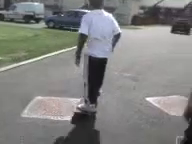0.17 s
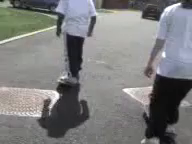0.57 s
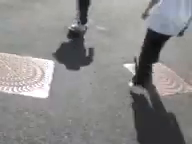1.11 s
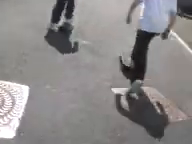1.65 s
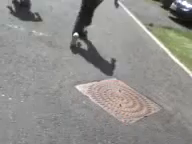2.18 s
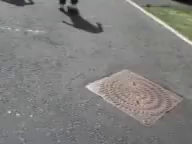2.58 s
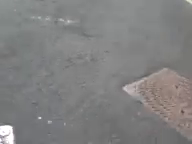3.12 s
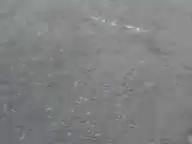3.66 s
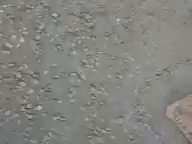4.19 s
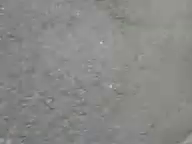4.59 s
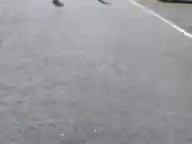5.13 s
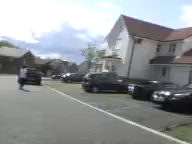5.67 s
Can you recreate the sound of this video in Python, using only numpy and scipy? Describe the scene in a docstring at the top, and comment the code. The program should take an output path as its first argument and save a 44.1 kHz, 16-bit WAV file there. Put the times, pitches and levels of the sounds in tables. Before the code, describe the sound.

Hard skateboard wheels rumble and rattle over coarse asphalt, with irregular clacks and knocks that grow denser and peak in a harsh, overloaded burst.

```python
"""On an open street, skateboards roll over coarse asphalt and ribbed drain covers.
Grit and small stones under the hard wheels excite the modes of deck, wheels and axles all the time.
Stones and edges strike the same modes harder; once a foot or board tail lands with a dull thump.
Far traffic and air lie behind as coloured noise.
A small microphone with a narrow band overloads on the loudest knocks."""
import sys
import numpy as np
from scipy import signal
from scipy.fft import rfft, irfft
from scipy.io import wavfile

SR = 44100
rng = np.random.default_rng(int(sys.argv[2]) if len(sys.argv) > 2 else 0)


def int16_out(signal):
    """Quantize to a 16-bit WAV file."""
    q = np.round(np.clip(np.atleast_2d(signal).T, -1, 1) * 32767)
    wavfile.write(sys.argv[1], SR, q.astype(np.int16))


def boost_factor(decibels):
    """Convert a level in decibels to a linear amplitude factor."""
    exponent = np.asarray(decibels, float) / 20
    return 10 ** exponent


N = 254222

# How hard the boards roll, and how much of it is loose rattle in the axles.
# Each row: time in seconds, rolling level in dB, rattle share in dB.
ROLLING_COURSE = [(0, -29, -4.5), (.3, -26, -9), (.65, -25.5, -2), (.97, -29, -8), (1.25, -21, -3.5),
                  (1.58, -20.5, -2.5), (1.7, -29, -2.5), (1.9, -28.5, 0), (2.07, -17, -8),
                  (2.25, -21.5, -3), (2.47, -23.5, -5), (2.65, -20.5, -4), (2.82, -22, -12),
                  (3.25, -17.5, -10), (3.56, -25.5, -5.5), (3.87, -21.5, -11), (4.15, -24, -10),
                  (4.35, -32, -4), (4.7, -27.5, 0), (4.86, -15, -2.5), (4.97, -22, -8.5), (5.3, -26, -7.5),
                  (5.553, -34.5, -12.5), (5.57, -16, 1), (5.65, -15, -6.5), (5.76, -12, -17)]
# Resonances of the three parts of a board.
# Each row: frequency in Hz, level in dB, decay time to -60 dB in seconds.
DECK_MODES = [(301.6, 1.5, 0.019), (361.2, 7.5, 0.027), (425, 3, 0.0091)]
WHEEL_MODES = [(560, -4, 0.026), (641, -4.5, 0.033), (769.4, 2.5, 0.015), (867, -1.5, 0.0094)]
AXLE_MODES = [(1151.6, -2.5, 0.016), (1440, -1.5, 0.011), (1659, 1, 0.0056), (1831, -2.5, 0.01),
              (2177, -3.5, 0.011), (2430, -0.5, 0.0097), (2720, -5, 0.0063), (3156, -11, 0.021),
              (3820, -36.5, 0.022)]


def rms_one(x):
    """Normalisation: division by the root mean square gives unit power."""
    return x / np.sqrt(np.mean(x ** 2) + 1e-20)


def drift(corner_hz):
    """Slow random modulation of rms 1: noise through two equal one-pole low-passes."""
    step = 40      # samples between the points of the slow curve
    pole = np.exp(-2 * np.pi * corner_hz * step / SR)
    noise = rng.standard_normal(N // step + 2002)
    slow = signal.lfilter([1], [1, -2 * pole, pole * pole], noise)[2000:]      # settled part only
    return np.interp(np.arange(N) / step, np.arange(len(slow)), rms_one(slow))


def ring(push, hz, t60):
    """Damped resonator: a unit impulse sets off a decaying sine of initial height 1."""
    radius = boost_factor(-60 / (t60 * SR))
    angle = 2 * np.pi * hz / SR
    return signal.lfilter([0, np.sin(angle)], [1, -2 * radius * np.cos(angle), radius ** 2], push + 1e-18)


def clicks(per_s, spread_db):
    """Random impulse train: chance impulses of either sign, most small and a few large."""
    sizes = boost_factor(spread_db * np.minimum(rng.exponential(1, N), 4))
    signs = rng.choice([-1, 1], N)
    return sizes * signs * (rng.random(N) < per_s / SR)


def rolling(modes, lumps, stones, stone_db):
    """Modal excitation by roughness: grit and stones drive one part, each stone favouring some modes."""
    grit_per_s, crunch_s = 900, 0.0041
    fade = np.exp(-1 / (crunch_s * SR))
    out = 0
    for hz, level_db, t60 in modes:
        grit = rms_one(clicks(grit_per_s, spread_db=4.5)) * lumps
        favour = boost_factor(7.6 * np.clip(rng.standard_normal(N), -3, 1.4))
        crunch = rms_one(signal.lfilter([1], [1, -fade], stones * favour + 1e-18))
        push = grit + boost_factor(stone_db) * crunch * rng.standard_normal(N)
        push = push * boost_factor(2.97 * drift(10.9))      # each mode wavers by itself
        out = out + boost_factor(level_db) * rms_one(ring(push, hz, t60))
    return rms_one(out)


def struck(modes, share_db, loudest_hz, length_ms, lag_ms):
    """Impact excitation: a short rough force drives most the modes near the struck spot's pitch."""
    late = np.maximum(np.arange(4000) * 1000 / SR - lag_ms, 0)
    force = (1 - np.exp(-late / (0.092 * length_ms))) * np.exp(-late / length_ms)
    contact = rng.standard_normal(force.shape) * force
    octaves_off = np.log2(np.array(modes)[:, 0] / loudest_hz)
    chance_db = 3 * rng.standard_normal(octaves_off.shape)
    strengths = boost_factor(chance_db + 12 * np.exp(-(octaves_off / .2) ** 2))
    rings = 0
    for k, (hz, level_db, t60) in enumerate(modes):
        # the wheel passes mostly the pitches the part itself rings at: each resonance acts twice
        passed = ring(contact, hz, 0.44 * t60)
        rings = rings + boost_factor(level_db) * strengths[:, [k]] * ring(passed, hz, t60) / t60
    return rings / np.abs(rings).max(axis=1, keepdims=True) * boost_factor(share_db)


def knocks():
    """Coupled impact: each knock rings all parts, the heavy deck a little late, loose axles louder."""
    # Stones and edges that strike the board. Each row: start in seconds, peak level in dB ahead of the
    # bass cut, share of deck thud in dB, loudest ring in Hz, decay constant of the contact in ms.
    blows = [(0.072, -7.5, -8, 870, 15.6), (.115, -4, -16, 1120, 2.7), (0.275, -6, -26, 1150, 1.3),
             (0.338, -8, -8, 830, 14), (0.369, -4.5, -18.5, 1520, 1.8), (0.524, -18, -9, 750, 5.4),
             (.589, -5.5, -15, 920, 15), (.69, -8.5, -2, 760, 13), (1.168, -5, -14, 595, 1.4),
             (1.273, 0, -4, 494, 7.3), (1.466, 1, -46, 890, 2.6), (1.508, -4.5, -19, 1790, 16),
             (1.586, -5, -17, 795, 1.1), (1.651, -4, -4.5, 530, 2.1), (1.672, -3.5, -6.5, 797, 6.2),
             (1.72, -8.5, -4, 506, 1.8), (1.736, -2.5, -15, 614, 2.8), (1.872, -8.5, -3, 580, 0.76),
             (2.089, 0.5, -4.5, 556, 3.8), (2.104, -6.5, -4, 630, 4.2), (2.209, 2, -18.5, 615, 9.5),
             (2.254, 1, -14, 900, 0.7), (2.312, 4.5, -13.5, 900, 5.1), (2.387, -5, -5, 830, 8.6),
             (2.526, -3, -10, 620, 11.5), (2.577, 2.5, -9.5, 560, 3), (2.604, -19.5, -22, 2790, 3.2),
             (2.636, -5.5, -18, 790, 4.1), (2.654, -1, -22, 770, 4.2), (2.827, -8, -10, 754, 8.7),
             (2.919, 0, -0.5, 754, 7.6), (3.011, 1, -3, 780, 2.9), (3.048, -0.5, -4, 506, 3),
             (3.066, -0.5, -26, 780, 3.5), (3.176, -0.5, -14, 775, 1.7), (3.239, -8.5, -7, 780, 7.1),
             (3.357, -9.5, -2, 710, 6.3), (3.412, -7.5, -20, 660, 13), (3.459, 2, -38, 855, 5),
             (3.523, -1.5, -16, 750, 6), (3.619, -4, -10, 770, 17), (3.678, -5.5, -7.5, 630, 5.9),
             (3.725, 1.5, -16, 747, 7), (3.79, 4.5, -16, 660, 5.2), (4.081, -1.5, -15, 730, 1.6),
             (4.18, -4.5, -13, 800, 3.1), (4.251, -7.5, -12.5, 1980, 11), (4.269, -0.5, -15.5, 2180, 2.5),
             (4.454, -5, 22, 544, 4.2), (4.509, 1.5, -34, 565, 10), (4.558, 3, -12, 550, 6.8),
             (4.603, 3.5, -14, 567, 5), (4.64, 11, -7.5, 1430, 6.8), (4.691, -2, -25, 1410, 1.8),
             (4.707, 4, -15, 560, 9.9), (4.749, 12.5, -20, 632, 11), (4.781, 3, -9.5, 1440, 15),
             (4.82, 3, -11, 650, 2.5), (4.835, 2.5, -11.5, 555, 6.5), (4.904, -0.5, -15.5, 615, 5.4),
             (4.983, -5, -2, 816, 14), (5.031, 0.5, -10, 654, 4.6), (5.161, -1, -17, 854, 6.4),
             (5.197, -10, -19, 2500, 4), (5.242, -5.5, -11, 560, 7.1), (5.258, -7.5, -19, 1440, 3.8),
             (5.567, -4.5, -19, 1850, 4.8), (5.6, 2, -6, 572, 9), (5.694, -1, -4.5, 795, 12),
             (5.722, 0, -4.5, 755, 8.9)]
    s, peak_db, deck_db, loudest_hz, length_ms = np.transpose(blows)[:, :, None]
    times, _, rattle_db = np.transpose(ROLLING_COURSE)
    axle_db = -7.5 + 0.96 * np.interp(s, times, rattle_db)
    wheel_db = np.where(loudest_hz < 1000, -8.0, -17.0)      # a high knock misses the wheels' own ring
    rings = struck(DECK_MODES, deck_db, loudest_hz, length_ms, lag_ms=0.87)
    rings = rings + struck(WHEEL_MODES, wheel_db, loudest_hz, length_ms, lag_ms=0)
    rings = rings + struck(AXLE_MODES, axle_db, loudest_hz, length_ms, lag_ms=0)
    rings = rings / np.abs(rings).max(axis=1, keepdims=True) * boost_factor(peak_db)
    out = np.zeros(N + rings.shape[1])
    for start, one in zip((s[:, 0] * SR).astype(int), rings):
        out[start:start + len(one)] += one
    return out[:N]


def board():
    """Superposition: the three ringing parts roll and are knocked."""
    deck_db, wheel_db = 2, -2      # shares relative to the rolling level
    small_stones_per_s = 70
    s, rolling_db, rattle_db = np.transpose(ROLLING_COURSE)
    t = np.arange(N) / SR
    level = boost_factor(np.interp(t, s, rolling_db))
    rattle = boost_factor(np.interp(t, s, rattle_db))
    lumps = boost_factor(1.75 * drift(15.0))      # uneven asphalt shakes all parts together
    stones = np.abs(clicks(small_stones_per_s, spread_db=2.5))
    parts = boost_factor(deck_db) * rolling(DECK_MODES, lumps, stones, stone_db=0.0)
    parts = parts + boost_factor(wheel_db) * rolling(WHEEL_MODES, lumps, stones, stone_db=1.0)
    parts = parts + rattle * rolling(AXLE_MODES, lumps, stones, stone_db=3.5)
    return level * parts + knocks()


def thumps():
    """Damped low resonance: a foot or board tail lands, a short rough push into one dull ring."""
    # Contacts of the landing. Each row: start in seconds, peak level in dB.
    landings = [(4.254, -17), (4.27, -12)]
    hz, t60, contact_ms = 248, .03, 2.5
    ms = np.arange(4000) * 1000 / SR
    out = np.zeros(N + len(ms))
    for s, peak_db in landings:
        push = rng.standard_normal(len(ms)) * ms * np.exp(-ms / contact_ms)
        one = ring(ring(push, hz, t60), hz, t60 / 2)
        start = int(s * SR)
        out[start:start + len(ms)] += boost_factor(peak_db) * one / np.abs(one).max()
    return out[:N]


def street():
    """Spectral shaping of noise: far traffic and air, smooth and swelling a little."""
    # Spectrum of the street noise. Each row: frequency in Hz, relative density in dB per Hz.
    spectrum = [(30, -34), (60, -13), (120, -8), (220, -11), (500, -9), (1500, -16), (3000, -29.5),
                (5000, -54)]
    points_hz, density_db = np.transpose(spectrum)
    hz = np.maximum(np.arange(N // 2 + 1) * SR / N, 1)
    colour = boost_factor(np.interp(np.log(hz), np.log(points_hz), density_db))
    noise = rms_one(irfft(rfft(rng.standard_normal(N)) * colour, N))
    return boost_factor(-38.5 + 6.2 * drift(5.1)) * noise


def echoed(near):
    """Reflection: house fronts and cars return one delayed, low-passed copy."""
    lag = int(.011 * SR)
    delayed = np.concatenate([np.zeros(lag), near[:-lag]])
    return near + boost_factor(-24) * signal.lfilter([.3], [1, -.7], delayed)


def scene():
    """Radiation and mixing: the boards with their echo lose bass, then landings and street join."""
    # a small board radiates little bass
    bass_cut = signal.butter(3, 301.5, "high", fs=SR, output="sos")
    thin = signal.sosfilt(bass_cut, echoed(board()))
    return (thin + thumps() + street())[None]


def low_pass(x):
    """Removes everything above the highest recorded frequency."""
    return signal.sosfilt(signal.butter(12, 16400, fs=SR, output="sos"), x)


def record(dry):
    """Nonlinear distortion: the preamp saturates lopsidedly, a steep low-pass follows, peaks clip."""
    overload, lopsided, full_scale = 1.175, .09, .71      # linear amplitude, share of square, amplitude
    x = overload * np.tanh(dry / overload)
    # one side saturates sooner, so bass puffs ride on knocks
    coupling = signal.butter(2, 70, "high", fs=SR, output="sos")
    x = x + lopsided * signal.sosfilt(coupling, x ** 2)
    x = signal.sosfilt(signal.butter(6, 4000, fs=SR, output="sos"), x)
    x = signal.sosfilt(signal.cheby2(12, 70, 4900, fs=SR, output="sos"), x)
    return low_pass(np.clip(x, -full_scale, full_scale))


dry = scene()
out = record(dry)
int16_out(out)
```